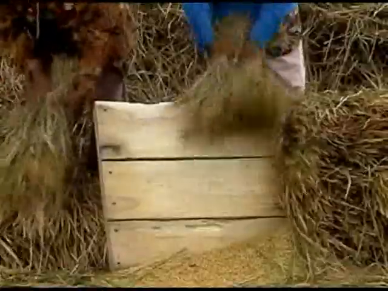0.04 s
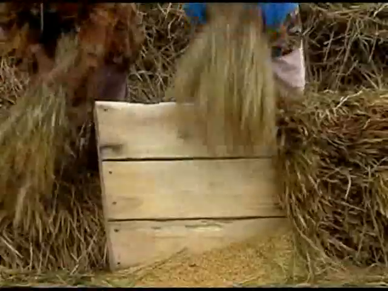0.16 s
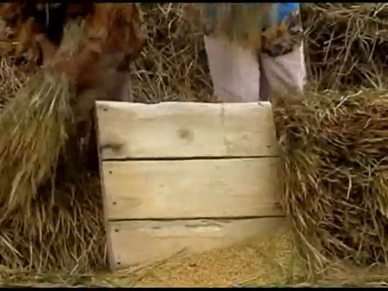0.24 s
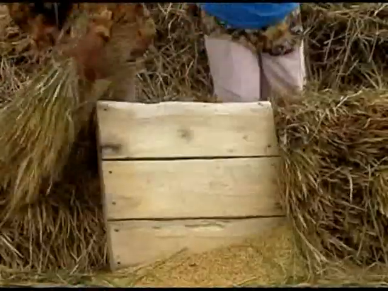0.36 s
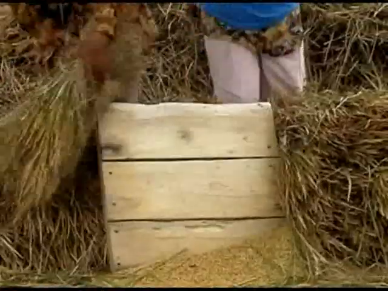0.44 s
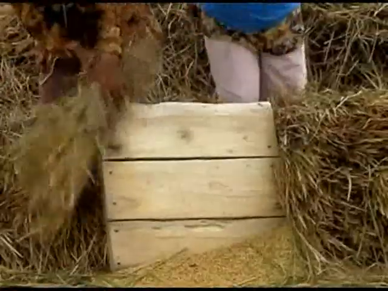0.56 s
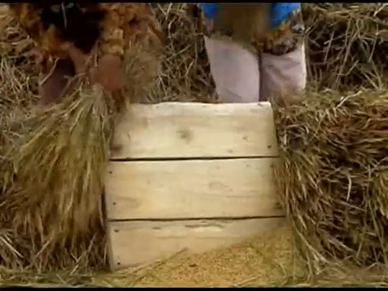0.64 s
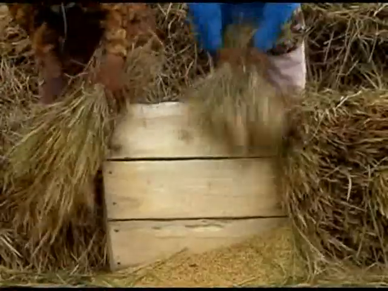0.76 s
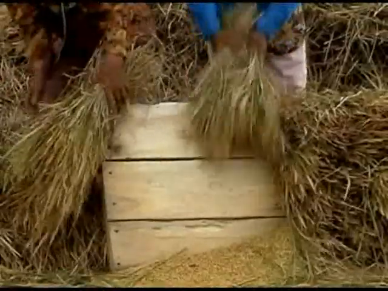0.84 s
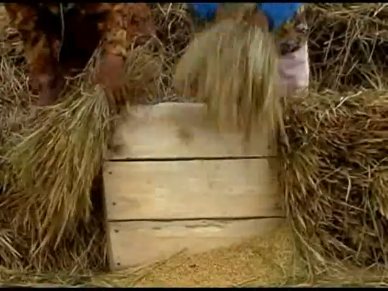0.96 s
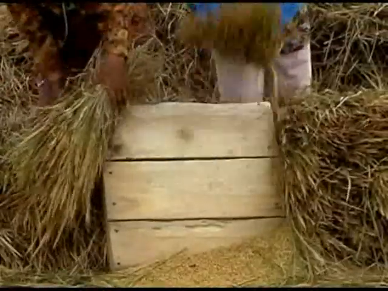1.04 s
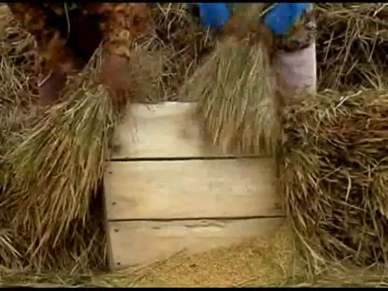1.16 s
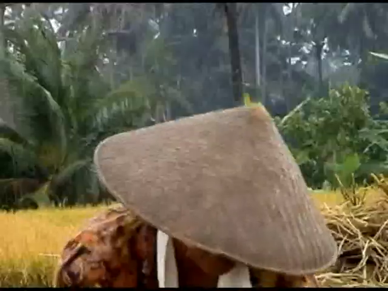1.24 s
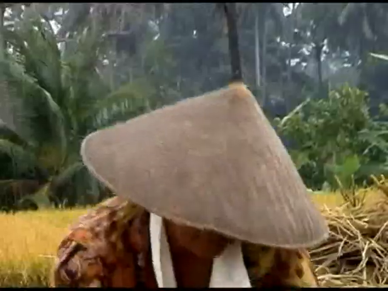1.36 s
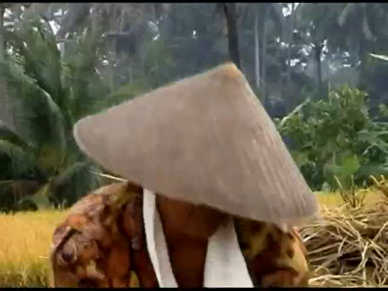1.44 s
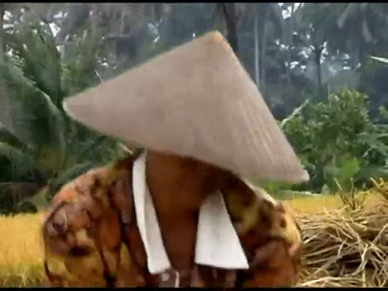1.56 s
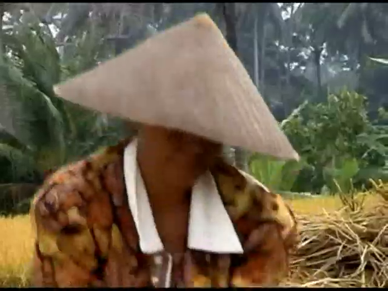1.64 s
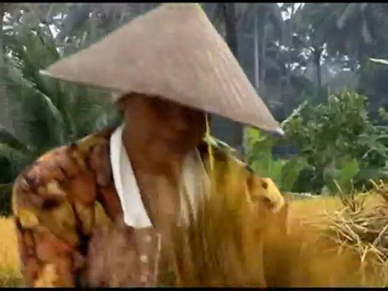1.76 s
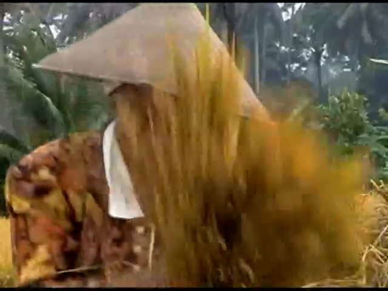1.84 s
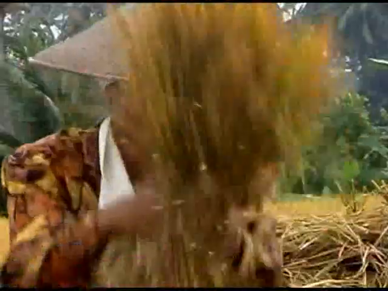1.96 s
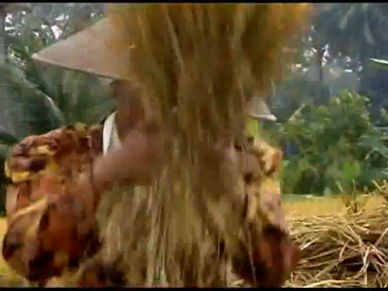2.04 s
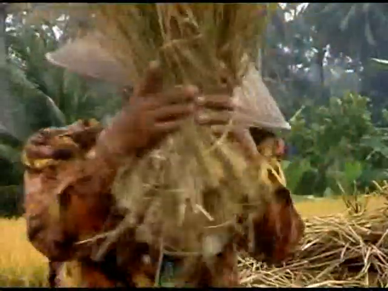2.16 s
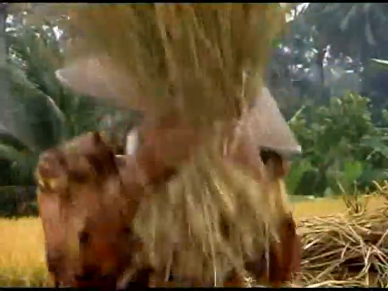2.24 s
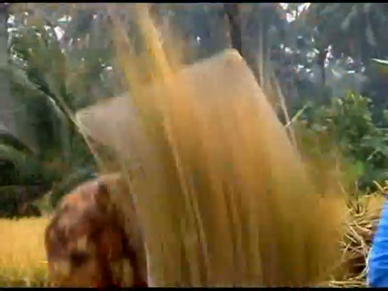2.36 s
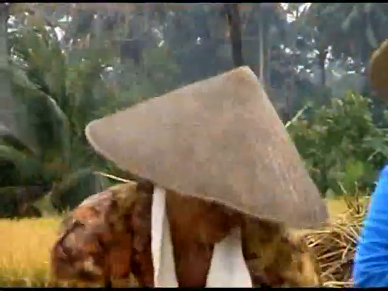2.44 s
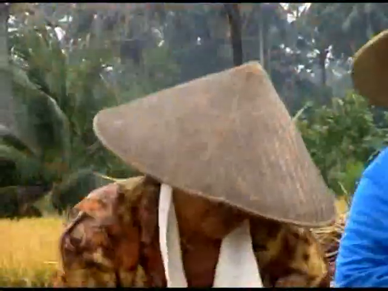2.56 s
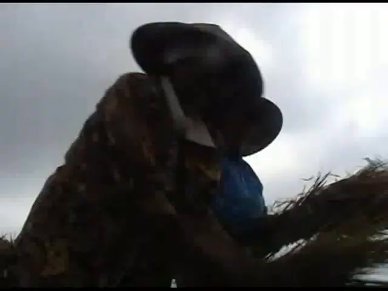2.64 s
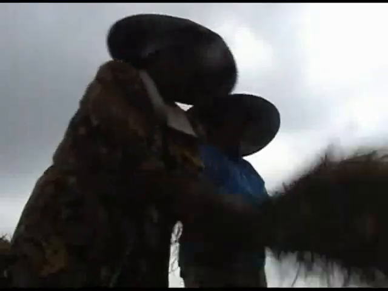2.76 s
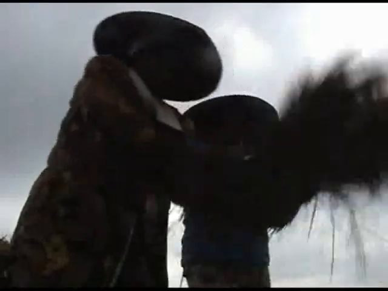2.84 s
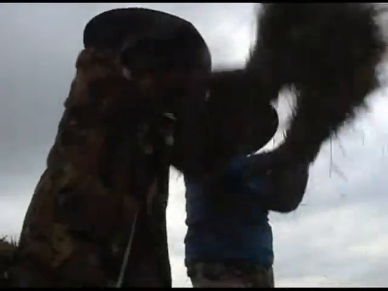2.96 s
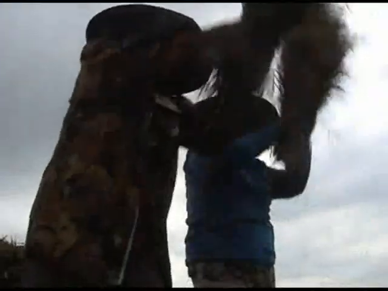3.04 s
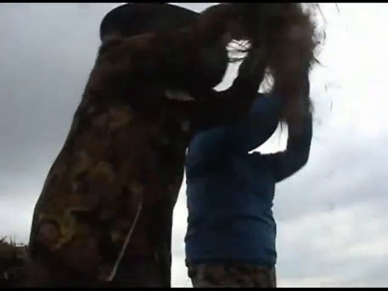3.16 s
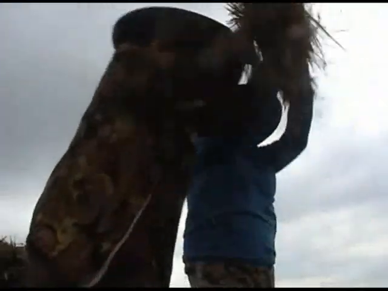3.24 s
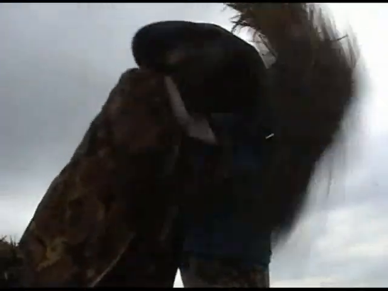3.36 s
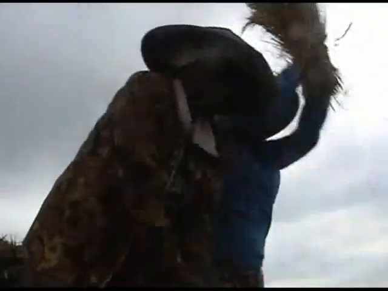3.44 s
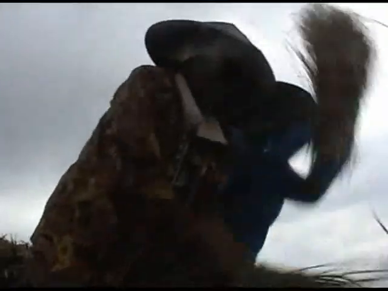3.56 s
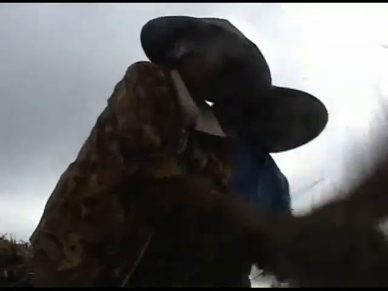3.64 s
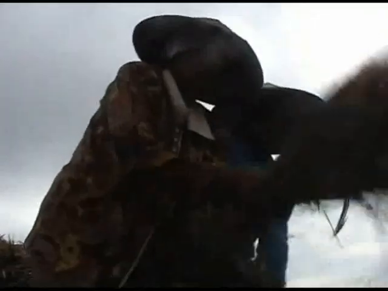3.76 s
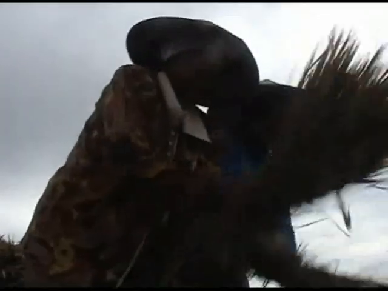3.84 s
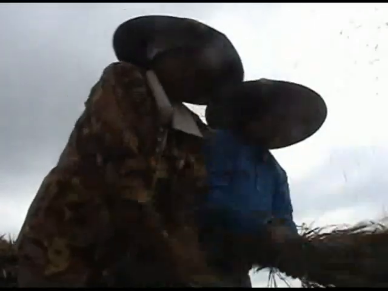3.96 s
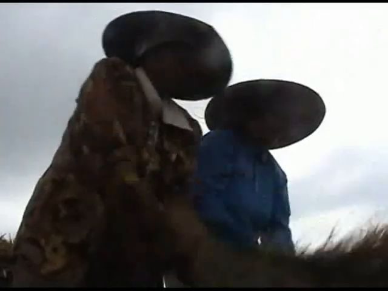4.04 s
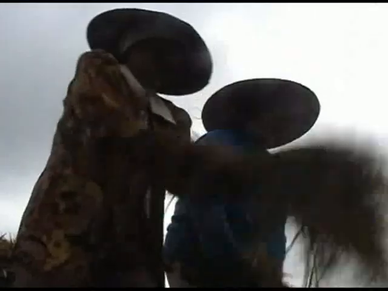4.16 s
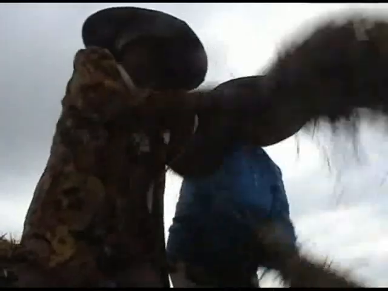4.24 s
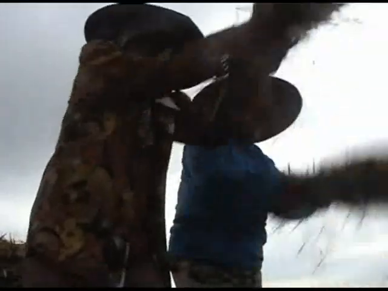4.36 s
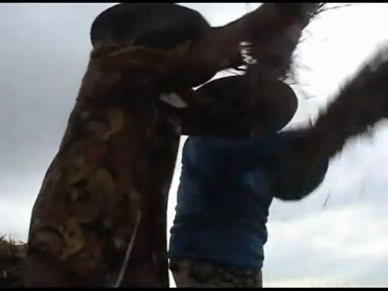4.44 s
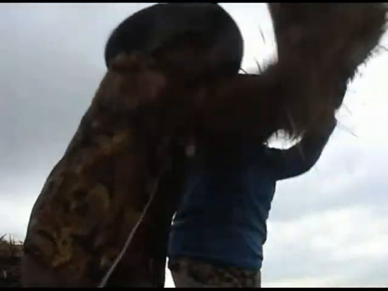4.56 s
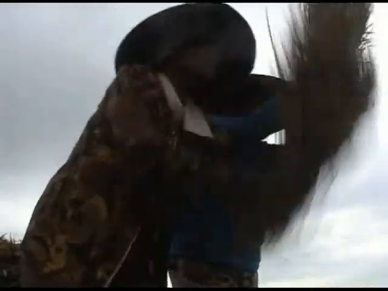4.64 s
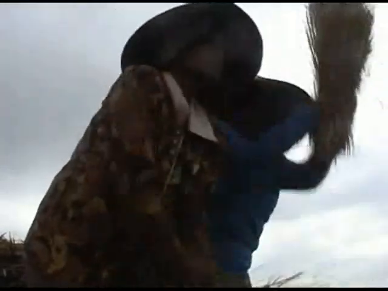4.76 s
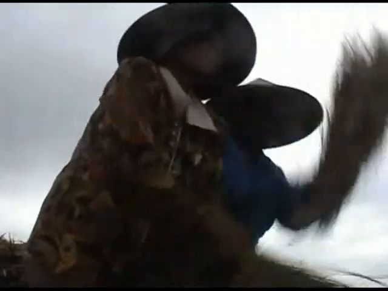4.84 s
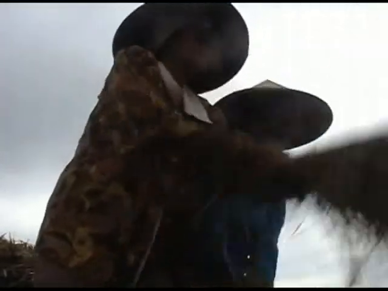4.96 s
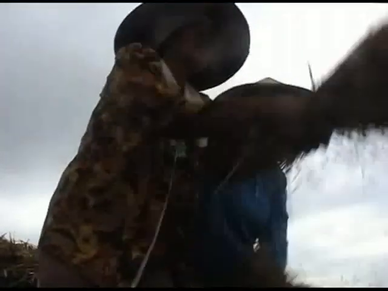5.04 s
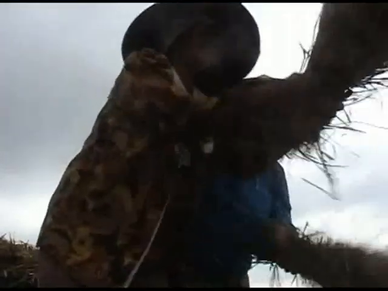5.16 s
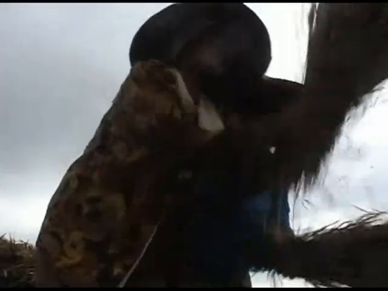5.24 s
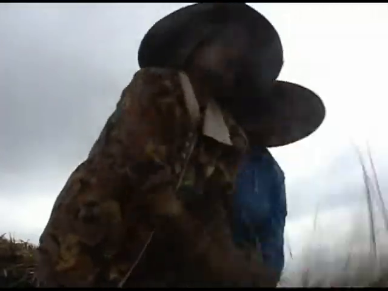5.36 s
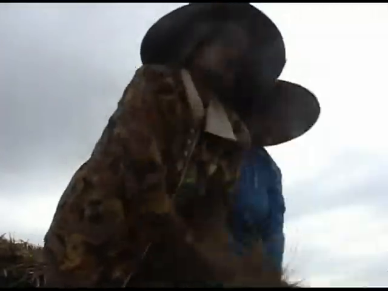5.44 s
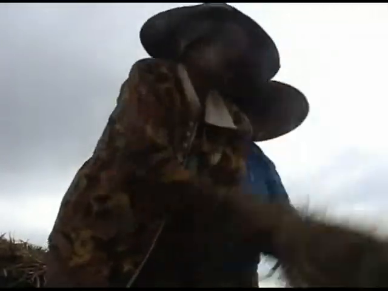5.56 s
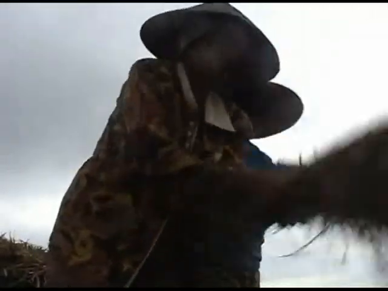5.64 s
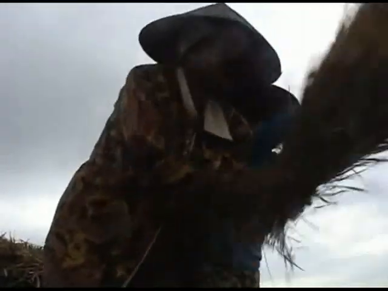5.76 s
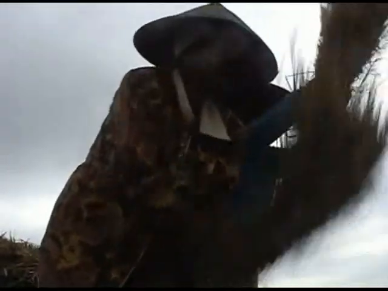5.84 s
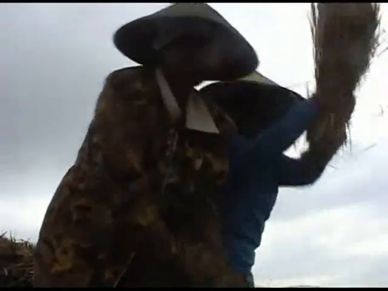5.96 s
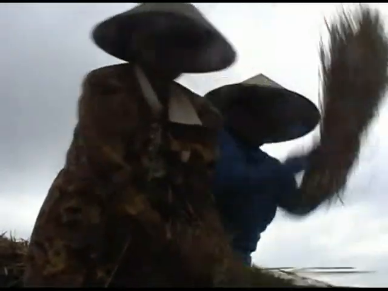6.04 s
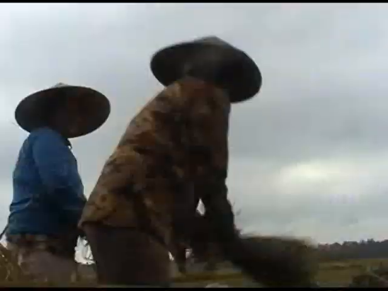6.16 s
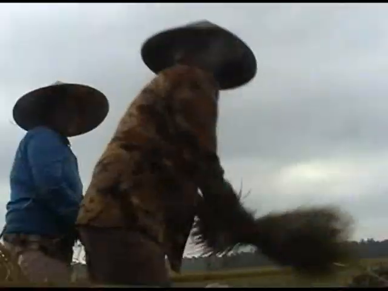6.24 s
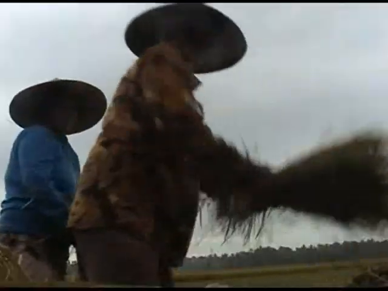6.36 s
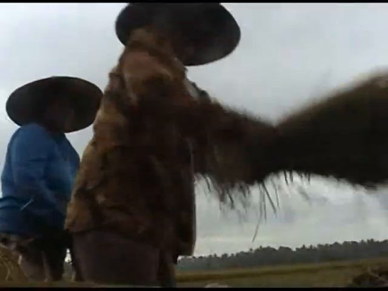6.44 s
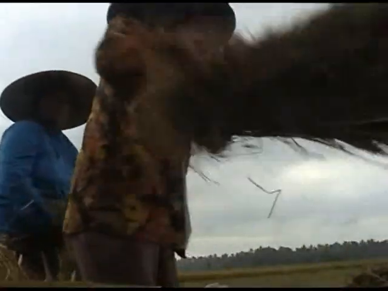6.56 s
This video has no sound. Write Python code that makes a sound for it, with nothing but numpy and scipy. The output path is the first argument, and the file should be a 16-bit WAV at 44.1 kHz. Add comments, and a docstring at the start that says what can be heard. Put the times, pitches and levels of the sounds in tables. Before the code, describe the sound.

Rice sheaves are beaten on a wooden board in an open field, close to the microphone, over faint hiss. Each blow combines a sharp crack of stalks, a slightly hollow plank knock and a hiss of husks, with a soft swish and hardly any echo. Straw rustle and small grain ticks open the scene. A thwack lands at 0.7 seconds, a softer one at 1.1 amid a cluster of ticks, and a loud one at 2.5. Faint, distant birds whistle around 0.3, 1.6 and 2.4 seconds, with one low hoot near 2. From 3.4 the blows come faster and unevenly: a heavy one at 3.7, lighter ones around 4, then strong hits at 4.7, 4.9, 5.4, 5.9 and 6.2. Straw rustles and grain patters between them. Right after the last blow the whole sound drops abruptly, then creeps partly back.

```python
"""Rice sheaves beaten on a slatted wooden board by two workers in an open field.
Each blow is a swarm of stalks landing within some 20 ms: the planks knock, straw and husks hiss.
Loose grain patters around the board and ticks close to the microphone, a small camera's two-port pair.
Straw rustles between blows, birds call far off, and the stacks around give a faint, short answer.
After the last blow the level drops abruptly and creeps back."""
import sys
import numpy as np
from scipy import signal
from scipy.fft import rfft, irfft, next_fast_len
from scipy.io import wavfile
from scipy.ndimage import map_coordinates

SR = 44100
rng = np.random.default_rng(int(sys.argv[2]) if len(sys.argv) > 2 else 0)


def master(y):
    """Save y as 16-bit WAV."""
    cut = np.clip(np.atleast_2d(y).T, -1, 1)
    pcm = np.round(cut * 32767)  # scale
    wavfile.write(sys.argv[1], SR, pcm.astype(np.int16))


N = 290703
T = np.arange(N) / SR

# sheaves landing on the board: (time [s], rise [s], hold [s], straw level [dB],
# planks [dB re straw], thump [dB re straw], swish of the swing [dB])
BLOWS = [(.741, 0.0041, 0.0078, -13, -10, -24.5, -47.5), (1.119, .016, 0.015, -26, -16, -47, -51),
         (2.457, 0.0029, 0.015, -9.5, -12, -34.5, -42.5), (2.482, 0.0065, 0.0052, -16, -18, -33, -43.5),
         (3.426, 0.0088, 0.0092, -13, -5, -27.5, -43.5), (3.693, 0.0056, 0.011, -12, -5, -30, -43.5),
         (3.704, 0.0062, 0.0096, -10.5, -6, -27, -44), (3.954, 0.0047, 0.015, -22, -8, -37, -44),
         (4.098, .035, 0.025, -31, -15.5, -40, -46), (4.715, 0.011, 0.0068, -15, -4.5, -23, -47),
         (4.934, .012, 0.0079, -11.5, -5, -29, -44.5), (5.356, 0.0085, .008, -33, -17, -29, -47),
         (5.382, .014, .008, -17, -8, -25, -44.5), (5.91, 0.012, 0.015, -23.5, -4, -23.5, -50.5),
         (6.162, 0.0098, 0.0085, -15.5, -1, -30.5, -52)]
# hiss of shaken husks: (frequency [Hz], level [dB])
HUSK_SPECTRUM = [(2500, -38.5), (4500, -10.5), (6800, -0.5), (9000, -3), (11000, -1.5)]


def sheaf_blows(husk_db=-4.5, hollow_db=-22.5, knock_db=-10.5):
    """Stalks land, sometimes in two bunches; they crack, drive the planks and shake their husks."""
    # crack of the stalks: (frequency [Hz], level [dB])
    stalk_spectrum = [(40, -30), (120, -12.5), (300, -10.5), (600, -5.5), (1200, -4.5), (2000, 1),
                      (2800, 4), (3600, 2), (4500, -6), (6500, -18), (11000, -26)]
    # the whole board's thump, hollow and knock modes: (frequency [Hz], t60 [s])
    board_modes = [(104, 0.15), (222, 0.039), (525, 0.076)]
    firm_db, firm_t60_s, doubling_db = -13, 0.049, 14.5
    out, t = np.zeros(N), np.arange(SR // 3) / SR
    for start, rise, hold, db, plank_db, thump_db, _ in BLOWS:
        # a firm blow stops dead; a softer one takes longer to settle
        settle_t60 = firm_t60_s * 2 ** ((firm_db - db) / doubling_db)
        landing = np.clip(t / rise, 0, 1) ** 1.32 * decay(np.maximum(t - rise - hold, 0), settle_t60)
        straw = colour(landing * impacts(len(t), per_s=6000, spread_db=2), stalk_spectrum)
        husks = colour(landing * impacts(len(t), per_s=12000, spread_db=3.5), HUSK_SPECTRUM)
        wood = filtered(landing * impacts(len(t), per_s=5500, spread_db=0.5), plank_response)
        blow = unit(straw) + amp(husk_db) * unit(husks) + amp(plank_db) * unit(wood)
        # the sheaf's weight pushes the whole board once, loading it a little differently each time
        push = np.clip(t / (rise + hold / 2), 0, 1) ** 2
        since_push = np.maximum(t - rise - hold / 2, 0)
        for (hz, t60), mode_db in zip(board_modes, [thump_db, hollow_db, plank_db + knock_db]):
            loaded_hz = hz * (1 + 0.029 * rng.standard_normal())
            blow += amp(mode_db) * unit(np.sin(2 * np.pi * loaded_hz * t) * push * decay(since_push, t60))
        landing_rms = np.sqrt(np.mean(landing ** 2))
        add(out, start, amp(db) * landing_rms * blow)
    return out


def plank_response(hz):
    """The planks answer through damped modes of alternating sign."""
    # plank modes: (frequency [Hz], bandwidth [Hz], level [dB])
    modes = [(187, 18, -4), (260, 66, -8.5), (397, 36, -6), (507, 75, -2), (723, 87, 0), (1010, 220, 1.5),
             (1178, 216, 3), (1617, 130, 1), (2550, 530, -4.5)]
    return sum((-1) ** k * amp(db) * resonance(hz, centre, width)
               for k, (centre, width, db) in enumerate(modes))


def swing_gain(downswing_s=0.085, lift_s=0.24):
    """A sheaf's swish builds steeply on the downswing and ebbs more slowly on the lift."""
    bells = [amp(swish_db) * np.exp(-((T - s) / np.where(T < s, downswing_s, lift_s)) ** 2)
             for s, *_, swish_db in BLOWS]
    return np.max(bells, axis=0)


def grain_ticks(snap=4, rattle_t60_s=0.027, ring_gain=0.6, ring_t60_s=0.03, detune=0.08, gain_db=0.5):
    """A hard grain striking near the microphone gives one sharp snap, a dry rattle and a brief ring."""
    # grain strikes: (time [s], relative peak level [dB])
    strikes = [(0.071, -26), (0.21, -23.5), (0.286, -25), (0.296, -24), (0.379, -23.5), (0.422, -25.5),
               (0.44, -17.5), (0.831, -25), (0.844, -20.5), (0.939, -19), (0.971, -25), (1.017, -18),
               (1.032, -28.5), (1.06, -24.5), (1.121, -17), (1.178, -22), (1.184, -16.5), (1.196, -20),
               (1.22, -23), (1.239, -19.5), (1.274, -22.5), (2.669, -21), (4.242, -26.5), (4.297, -24.5),
               (4.625, -25), (5.147, -29.5), (5.772, -28.5), (6.039, -27.5)]
    # snap and rattle: (frequency [Hz], level [dB])
    contact_spectrum = [(100, -18.5), (350, -12.5), (650, -1.5), (1200, 0), (1800, -2), (2700, 1.5),
                        (3800, -3.5), (5000, -16), (7000, -21), (11000, -31.5)]
    # ring of a strike: (frequency [Hz], level [dB])
    modes = [(1170, -3.5), (2600, -1)]
    out, t = np.zeros(N), np.arange(SR // 20) / SR
    for start, db in strikes:
        contact = snap * (t == 0) + rng.standard_normal(len(t)) * decay(t, rattle_t60_s)
        ring = np.zeros(len(t))
        for hz, mode_db in modes:
            strength = amp(mode_db + 3 * rng.standard_normal())
            detuned_hz = hz * np.exp(detune * rng.standard_normal())
            ring += strength * np.sin(2 * np.pi * detuned_hz * t)
        tick = unit(colour(contact, contact_spectrum)) + ring_gain * unit(ring * decay(t, ring_t60_s))
        add(out, start, amp(db + gain_db) * tick / np.abs(tick).max())
    return out


def grain_patter(drop_t60_s=0.022):
    """Thrown grain rains down around the board, each drop a tiny burst of noise."""
    # showers of grain: (time [s], half length [s], level [dB])
    showers = [(.2, 1, -52.5), (1.08, .3, -46), (2.57, .08, -47.5), (4.32, 0.31, -43), (5.1, 0.2, -50.5),
               (5.75, 0.3, -44.5), (6.35, 0.16, -48)]
    # grain landing: (frequency [Hz], level [dB])
    spectrum = [(60, -19.5), (130, -8.5), (210, 4.5), (330, -4.5), (500, -1), (900, -4.5), (1700, 0),
                (3200, -3), (4500, -16.5), (10000, -22)]
    t = np.arange(SR // 50) / SR
    drops = np.abs(impacts(N, per_s=190, spread_db=1.6))
    bursts = signal.fftconvolve(drops, decay(t, drop_t60_s))[:N] * rng.standard_normal(N)
    return swells(showers) * unit(colour(bursts, spectrum))


def rustle_and_air(rustle_db=-1, swing_hiss_db=-3, handling_hiss_db=-6, distant_hiss_db=-10):
    """Swung, handled and distant sheaves rustle and their ears hiss over the soft air of the field."""
    # a sheaf gathered or turned between blows: (time [s], half length [s], level [dB])
    handling = [(0, 0.062, -37.5), (.15, 0.12, -46.5), (.62, 0.1, -45.5), (1.44, 0.12, -44),
                (1.87, 0.071, -51.5), (2.2, 0.17, -48), (3.2, 0.15, -58), (4.35, 0.12, -49.5),
                (5.1, 0.087, -51), (6.54, 0.054, -50.5)]
    # ambience, the background dropping at 2.7 s and rising again by 3.8 s: (time [s], field air [dB], distant
    # rustle [dB])
    ambience = [(0, -57, -51.5), (1.4, -55.5, -49), (2.66, -58, -48.5), (2.73, -63.5, -58.5),
                (3.3, -64.5, -57), (3.8, -57, -46.5), (6.59, -61, -53)]
    # moving straw: (frequency [Hz], level [dB])
    rustle_spectrum = [(200, -19), (700, -9.5), (1400, -7.5), (2600, -0.5), (3600, -2.5), (5000, -11),
                       (7000, -13.5), (11000, -25.5)]
    # open-field air: (frequency [Hz], level [dB])
    air_spectrum = [(25, -19), (60, -6), (110, 0), (200, -3), (330, -6), (520, -2), (800, -4.5),
                    (1200, -8.5), (3000, -22), (10000, -46)]
    air_db, distant_db = curves(ambience)
    shake = amp(1.2 * wobble(25))
    motions = np.array([swing_gain() * shake, swells(handling) * shake, amp(distant_db)])
    hiss_gains = amp([[swing_hiss_db], [handling_hiss_db], [distant_hiss_db]]) * motions
    straw = unit(colour(impacts(N, per_s=6600, spread_db=4), rustle_spectrum))
    husks = unit(colour(impacts(N, per_s=12000, spread_db=5), HUSK_SPECTRUM))
    air = unit(colour(rng.standard_normal(N), air_spectrum))
    straw_gain = amp(rustle_db) * np.linalg.norm(motions, axis=0)  # the motions add in power
    husk_gain = np.linalg.norm(hiss_gains, axis=0)
    return straw_gain * straw + husk_gain * husks + amp(air_db) * air


def far_birds(waver=0.008):
    """Far off, thin whistles flick up and slide down, and one bird gives a low hoot."""
    # calls: (time [s], length [s], start pitch [Hz], top pitch [Hz], end pitch [Hz], level [dB])
    calls = [(.31, 0.088, 4150, 4200, 3750, -55), (1.631, 0.16, 3840, 4330, 3850, -53.5),
             (1.983, 0.162, 732, 760, 705, -59), (2.36, 0.13, 4180, 4380, 4320, -47)]
    out = np.zeros(N)
    for start, length, start_hz, top_hz, end_hz, db in calls:
        progress = np.clip((T - start) / length, 0, 1)
        arch_hz = top_hz + (start_hz - top_hz) * (1 - progress) ** 8 + (end_hz - top_hz) * progress ** 2
        hz = arch_hz * (1 + waver * wobble(100))
        envelope = amp(db + 2.8 * wobble(50)) * np.sqrt(8 * progress * (1 - progress))
        out += envelope * np.sin(2 * np.pi * np.cumsum(hz) / SR)
    return out


def stack_scatter(x):
    """The straw stacks around throw back a short stereo tail whose treble dies first."""
    # decay of the scatter: (frequency [Hz], t60 [s])
    decay_times = [(200, 0.46), (500, 0.28), (1500, .16), (9000, 0.13)]
    hz, t, noise = signal.stft(rng.standard_normal((2, SR // 2)), SR, nperseg=256)
    tail = signal.istft(noise * decay(t, along(decay_times, hz)[:, None]), SR, nperseg=256)[1]
    return signal.fftconvolve(x[None], tail / np.linalg.norm(tail[0]), axes=1)[:, :N]


def mic_pair(source, width):
    """Two close ports share most of a crowd of tiny sounds; the rest reaches them out of phase."""
    mid = source()
    side = filtered(source(), lambda hz: -1j * amp(along(width, hz)))
    return np.array([mid + side, mid - side])


def hum_notches(hz, spacing_hz=300, width_hz=32, depth=0.7, count=14):
    """The camera's narrow hum notches ring briefly after a blow, which leaves a hollow tail."""
    centres = spacing_hz * np.arange(1, count + 1)
    return 1 - depth * sum(resonance(hz, centre, width_hz) for centre in centres)


def amp(db):
    """Decibels to gain."""
    return 10 ** (np.asarray(db) / 20)


def decay(t, t60):
    """Gain that falls 60 dB every t60 seconds."""
    return amp(-60 * t / t60)


def unit(x):
    """Scale to rms 1."""
    return x / np.sqrt(np.mean(x ** 2) + 1e-20)


def along(points, hz):
    """Interpolate (frequency [Hz], value) points on a log axis."""
    freqs, values = np.transpose(points)
    return np.interp(np.log(hz + 1), np.log(freqs + 1), values)


def curves(rows):
    """One value per sample for each column after the time."""
    times, *columns = np.transpose(rows)
    return np.array([np.interp(T, times, column) for column in columns])


def swells(rows):
    """Gain of bell-shaped swells (time [s], half length [s], level [dB]), added in power."""
    return np.sqrt(sum(amp(db) ** 2 * np.exp(-2 * ((T - s) / half) ** 2) for s, half, db in rows))


def wobble(per_s):
    """A smooth random curve with per_s knots a second."""
    return map_coordinates(rng.standard_normal(int(N * per_s / SR) + 4), [T * per_s])


def impacts(n, per_s, spread_db):
    """Tiny random impacts of uneven size, rms 1."""
    clicks = (rng.random(n) < per_s / SR) * rng.choice([-1, 1], n)
    return unit(clicks * amp(spread_db * rng.standard_normal(n).clip(-2, 2)))


def resonance(hz, centre, width):
    """Complex band-pass response of one damped mode."""
    return 1j * hz * width / (centre ** 2 - hz ** 2 + 1j * hz * width)


def filtered(x, response):
    """Filter x by a complex response of frequency."""
    n = x.shape[-1]
    padded = 2 * next_fast_len(n // 2 + SR // 10)
    return irfft(rfft(x, padded) * response(np.fft.rfftfreq(padded, 1 / SR)), padded)[..., :n]


def colour(x, spectrum):
    """Minimum-phase filter through (frequency [Hz], level [dB]) points."""
    def response(hz):
        cepstrum = irfft(np.log(amp(along(spectrum, hz))))
        half = len(cepstrum) // 2
        cepstrum[1:half] *= 2
        cepstrum[half + 1:] = 0
        return np.exp(rfft(cepstrum))
    return filtered(x, response)


def add(track, start_s, sound):
    """Mix a sound in at start_s."""
    i = max(round(start_s * SR), 0)
    track[i:i + len(sound)] += sound[:max(N - i, 0)]


def scene(scatter_db=-30):
    """Blows and close ticks in front, rustle and patter all around, birds far off in the centre."""
    # stereo width of blows and ticks: (frequency [Hz], side re mid [dB])
    hit_width = [(30, 0), (80, -23), (300, -27), (1000, -18.5), (2500, -11), (4000, -11), (5200, 5),
                 (7000, -4.5), (10500, -7)]
    # stereo width of sound from all around: (frequency [Hz], side re mid [dB])
    field_width = [(100, -8), (500, -14.5), (2500, -11), (6500, -5)]
    hits = mic_pair(lambda: sheaf_blows() + grain_ticks(), hit_width)
    scatter = amp(scatter_db) * stack_scatter(hits.mean(axis=0))
    field = mic_pair(lambda: rustle_and_air() + grain_patter(), field_width)
    return hits + scatter + field + far_birds()


def record(dry, ceiling=0.93, top_hz=11100):
    """The camera's microphone: port resonances, hum notches, overload and band limit; after the last blow the
    whole sound also drops suddenly and creeps back."""
    # resonances of the microphone ports: (frequency [Hz], gain [dB])
    port_response = [(3900, 0), (4500, -2), (5100, -8.5), (5900, -5), (6600, 2), (7200, 8), (8300, 0.5),
                     (9200, 4), (10400, 8), (11200, 4.5)]
    # the whole sound drops after the last blow and creeps back: (time [s], gain [dB])
    level_drop = [(6.205, -0.5), (6.21, -22), (6.42, -18.5), (6.59, -7)]
    x = filtered(colour(dry, port_response), hum_notches)
    x = x * amp(curves(level_drop)[0])
    x = x / (1 + np.abs(x / ceiling) ** 10) ** (1 / 10)  # the hardest blows overload
    return filtered(x, lambda hz: 1 / np.sqrt(1 + (hz / top_hz) ** 220))


dry = scene()
out = record(dry)
master(out)
```